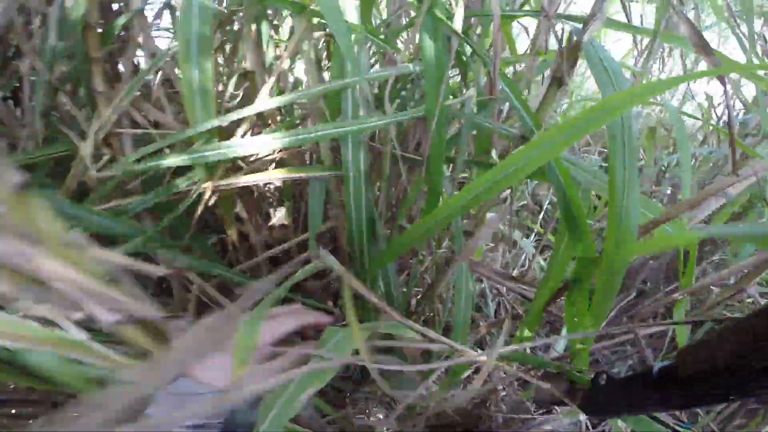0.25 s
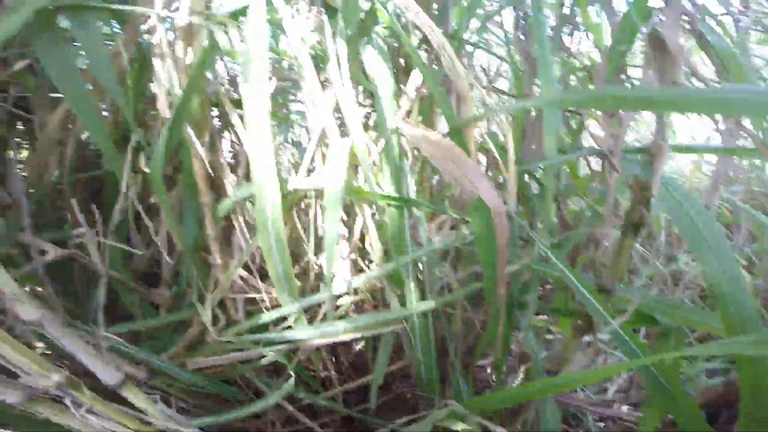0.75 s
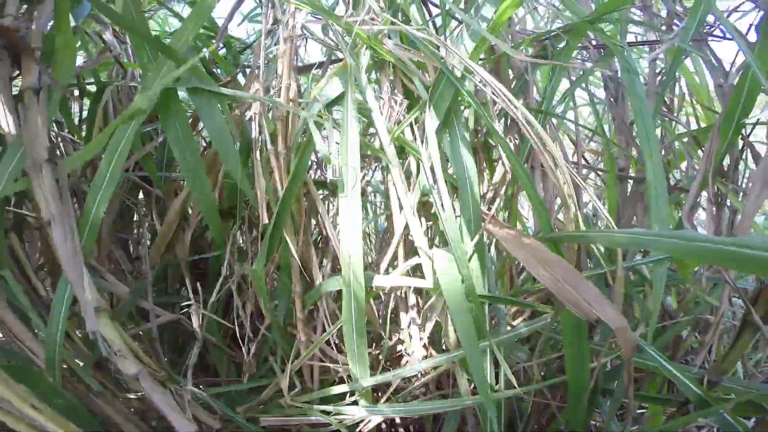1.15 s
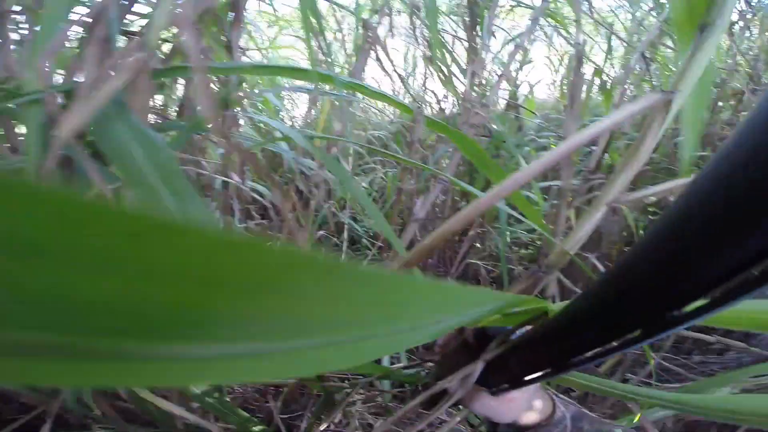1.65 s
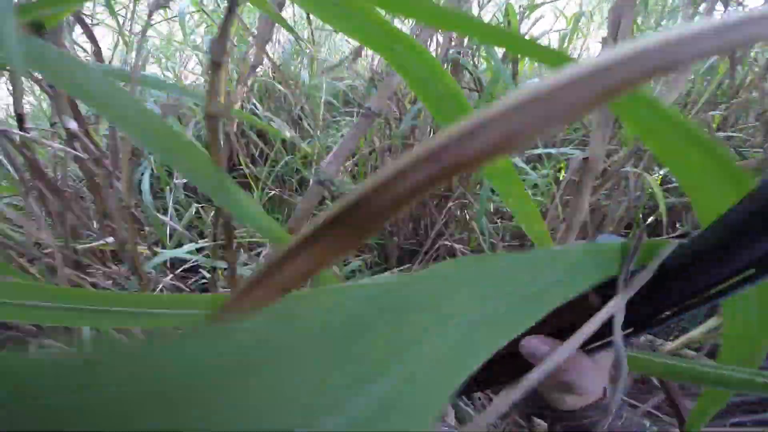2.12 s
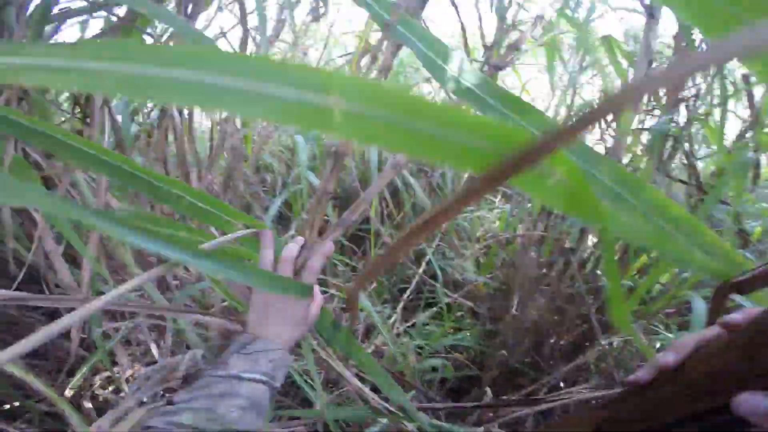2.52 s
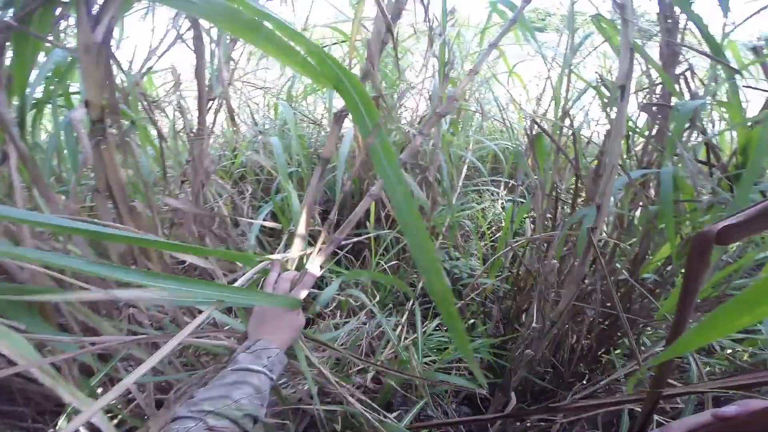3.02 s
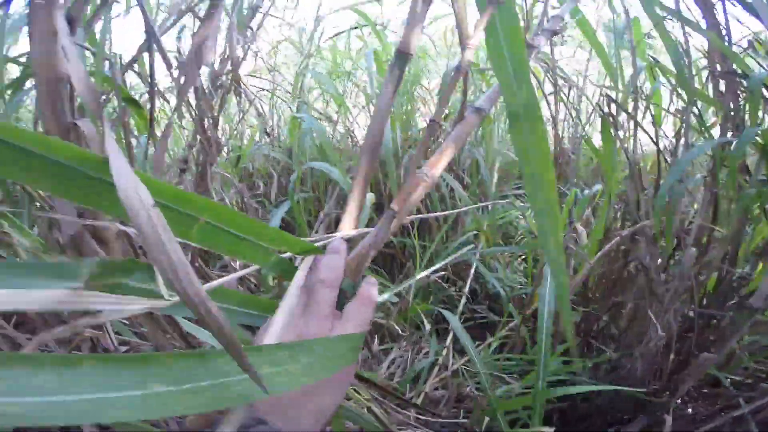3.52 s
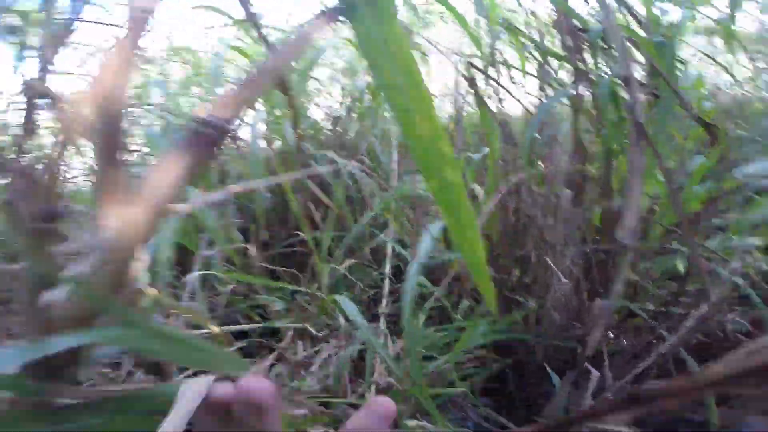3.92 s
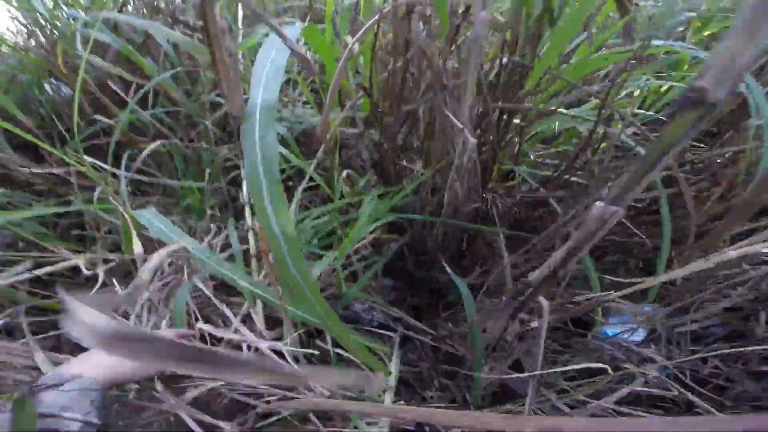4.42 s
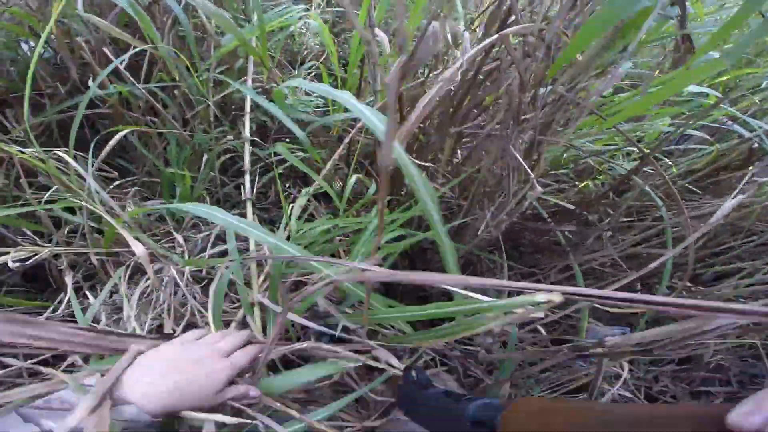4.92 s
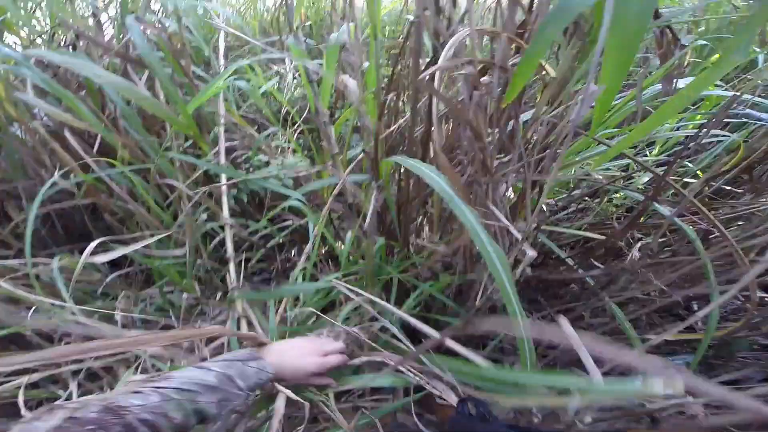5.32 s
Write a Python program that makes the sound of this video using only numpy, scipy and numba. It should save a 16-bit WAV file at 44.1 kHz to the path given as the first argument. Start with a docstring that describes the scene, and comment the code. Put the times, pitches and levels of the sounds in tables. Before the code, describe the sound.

Dense dry grass and reeds rustle and crackle right against a small body-worn camera outdoors. Sweeps of leaves swell over faint low rumble, strongest just after two seconds, with snapping stems, raspy blades and dull bumps. One very loud snap past four seconds drops into a quiet spell of tiny cracks, then sweeps, knocks and snaps crowd back in.

```python
"""Someone pushes through tall dry grass and reeds, a small camera on the chest; one port feeds both channels.
From 0 s short decaying sines merge into a rustle over band-noise rumble; sweeps swell it, fullest near 2.3 s.
Throughout, noise bursts make stems snap and stalks knock the housing, gritty narrow noise makes blades rasp,
and damped sines thump. The loudest snap, at 4.26 s, leads into a lull with small cracks; from about 4.9 s
the thumps, strong knocks and sweeps return, and snaps crowd the end."""
import sys
import numpy as np
from scipy import signal
from scipy.fft import rfft, irfft, next_fast_len
from scipy.io import wavfile
from scipy.ndimage import uniform_filter1d
from numba import njit

SR = 44100
rng = np.random.default_rng(int(sys.argv[2]) if len(sys.argv) > 2 else 0)


def persist_wave(psi):
    """Save psi, clipped to +-1, as 16-bit WAV."""
    counts = np.round(np.clip(psi, -1, 1) * 32767).astype(np.int16)
    wavfile.write(sys.argv[1], SR, np.atleast_2d(counts).T)


N = 245047

# Rumble level. Each row: time in seconds, deep band in dB, upper band in dB.
RUMBLE_LEVELS = [(0, -46, -50), (.6, -53, -43), (1.6, -46, -46.5), (1.9, -51.5, -51), (2.4, -46.5, -45),
                 (2.65, -55, -50), (2.85, -44.5, -44), (3.35, -47.5, -48.5), (4.22, -46, -42),
                 (4.29, -50, -53), (4.55, -55, -54), (4.86, -59, -51.5), (5.3, -50, -47), (5.556, -58, -49)]
# Dull thumps through the carrier's body. Each row: start in seconds, level before damping in dB, ring in Hz.
BODY_THUMPS = [(.124, -29.5, 204), (0.354, -36, 119), (.509, -31.5, 223), (.58, -26, 270), (.572, -32, 45),
               (.7, -25, 140), (.704, -36, 525), (2.38, -26, 517), (2.728, -31, 475), (2.775, -31, 35.2),
               (2.998, -37, 95), (3.34, -30, 50), (4.114, -25, 355), (4.315, -36, 200), (4.358, -41, 220),
               (4.408, -32, 133), (4.922, -32, 414), (5.228, -25, 353), (5.337, -23, 125),
               (5.478, -23, 420)]
# Stalks knocking the housing. Each row: top in seconds, level in dB, pitch in Hz, fall in ms.
HOUSING_KNOCKS = [(.1289, -31, 330, 4), (.3159, -37, 860, 10), (.5865, -32, 392, 11), (.707, -33, 754, 32),
                  (1.6235, -26.5, 1800, 1.5), (2.599, -28, 1000, 2.2), (3.0012, -28.5, 640, 11),
                  (3.0577, -33, 1280, 6), (3.097, -29, 550, 3), (3.221, -29.5, 700, 31),
                  (3.4045, -29.5, 550, 9.3), (4.2233, -32, 800, 7.7), (4.244, -30, 700, 6.6),
                  (4.9259, -35.5, 600, 21), (5.002, -37, 450, 7.4), (5.1824, -28.5, 990, 7),
                  (5.2351, -24.5, 670, 21), (5.3379, -23.5, 530, 71), (5.4817, -20.5, 680, 15)]
# Single blades dragged across each other. Each row: middle in seconds, level in dB, ring in Hz, length in ms.
BLADE_RASPS = [(.029, -27, 14000, 41), (.499, -32, 6600, 35), (0.576, -26, 8080, 55),
               (.721, -34, 2010, 120), (1.723, -27.5, 6500, 30), (2.326, -27.5, 5300, 54),
               (2.395, -21, 13700, 30), (2.696, -24, 5700, 26), (2.789, -31, 3260, 36),
               (3.223, -25, 2740, 23), (3.363, -24, 8650, 37), (3.419, -20, 8250, 55),
               (3.452, -34, 5700, 84), (3.513, -29, 5390, 110), (3.718, -26, 9400, 90),
               (3.753, -32, 5160, 88), (3.981, -26.5, 3900, 48), (4.207, -21, 8650, 26),
               (4.655, -29, 14100, 40), (5.272, -29, 3710, 39)]
# Dry leaves and stems breaking. Each row: top in seconds, leaf in dB, stem in dB, fall in ms.
STEM_SNAPS = [(0.1272, -13, -24, 3.5), (0.1395, -18, -36, 2), (0.5525, -32, -14.5, 1), (.5662, -13, -36, 1),
              (0.632, -20, -43, 13), (0.787, -25, -39, 1.7), (0.8358, -11, -43, 4.3), (1.1609, -30, -25, 2),
              (1.3113, -22, -40, 7), (1.6, -36, -24, 1), (1.6226, -11, -16, 1.2), (1.7497, -30, -26, 3),
              (1.8012, -10, -18, 5.4), (2.0692, -24, -22.5, 3), (2.1431, -24, -30, 5),
              (2.2251, -30, -22, 3), (2.2471, -30, -30, 1.5), (2.3223, -22, -24, 3), (2.4057, -11, -34, 1),
              (2.456, -19, -30, 1.5), (2.5956, -15, -23, 2.9), (2.6934, -26, -29, 6), (2.791, -26, -22, 5),
              (2.8289, -30, -18, 1.2), (3.032, -26, -18.5, 1), (3.0587, -28, -15.5, 4.7),
              (3.1487, -9.5, -32, .3), (3.2198, -17, -27, 2.2), (3.4134, -30, -21, 3),
              (3.4284, -15, -25, 4.6), (3.7246, -17, -28, 1), (3.7394, -28, -21, 2),
              (3.8901, -13, -32, 0.42), (3.8978, -21, -34, 1), (4.0425, -14, -34, 1),
              (4.053, -28, -21, 3.8), (4.138, -28, -18, 1.1), (4.205, -16, -37, 10),
              (4.2464, -14, -27, 2.7), (4.2587, -6, -8, 0.33), (4.3117, -21, -39, 1.2),
              (4.3178, -28, -42, 1), (4.339, -33, -48, 1), (4.3608, -27, -46, 3), (4.4608, -30, -48, 1.6),
              (4.596, -28, -46, 1), (4.6284, -40, -32.5, 4), (4.636, -21, -44, .5), (4.6692, -21, -42, .4),
              (4.6761, -17, -34, .4), (4.7042, -16, -38, 0.8), (4.724, -20.5, -40, 3),
              (4.7386, -34, -30, 3), (4.745, -25, -42, 2), (4.7657, -21, -40, 2.2), (4.833, -28, -38, 1.7),
              (4.9265, -32, -31, 2.6), (5.2409, -31, -24, 8), (5.2733, -20, -18, 1.8),
              (5.349, -26, -13.5, 1.5), (5.3592, -11, -30, 2.9), (5.384, -24, -13, 1.7),
              (5.41, -26, -31, 4.5), (5.4345, -16, -16, 1.1), (5.5233, -17, -30, 2), (5.5347, -7, -16, .5)]
# Pushing through. Each row: time in seconds, steady rustle in dB, extra rubbing on the housing in dB.
PUSH_LEVELS = [(0.0, -25, 1), (0.12, -26.5, -8), (0.2, -29, -2.5), (0.45, -28, 0.5), (0.65, -24.5, 1.5),
               (0.95, -27.5, 1.5), (1.1, -28.5, -1), (1.6, -29.5, 2.5), (1.8, -25.5, 2), (1.86, -32.5, 0),
               (1.98, -31, 2.5), (2.1, -24, 0), (2.5, -25.5, -1.5), (2.95, -25.5, -1.5), (3.3, -25, 2.5),
               (3.55, -24, 2), (3.64, -28.5, 5), (3.8, -24.5, 0.5), (4.25, -24.5, 5.5), (4.28, -42, 2.5),
               (4.5, -40.5, 4.5), (4.69, -36, 2.5), (4.74, -32, 1.5), (5.05, -28, 3.5), (5.22, -25, -6),
               (5.556, -25.5, -6)]
# Handfuls of grass swept aside. Each row: top in seconds, leaf in dB, stem in dB, housing in dB, rise in ms.
GRASS_SWEEPS = [(.055, -21.5, -38, -46, 66), (.135, -27, -34, -39, 14), (.335, -32, -38, -45, 24),
                (.58, -26.5, -33.5, -45, 74), (.72, -43, -32.5, -50, 60), (.93, -36, -34, -52, 75),
                (1.29, -32, -35, -57, 32), (1.72, -43, -33, -40, 35), (1.805, -27, -44, -50, 14),
                (2.245, -22.5, -41, -38, 36), (2.336, -16, -22.5, -32.5, 69), (2.375, -21, -23.5, -32, 35),
                (2.46, -21.5, -31, -42, 42), (2.555, -27, -37, -40, 28), (2.8, -25, -36, -46, 60),
                (2.86, -24, -31, -43, 17), (3.05, -21, -26.5, -43, 46), (3.095, -19, -27, -44, 30),
                (3.22, -21.5, -44, -43, 22), (3.43, -21, -46, -47, 86), (3.5, -21.5, -45, -51, 30),
                (3.72, -18.5, -35, -42, 34), (3.975, -21.5, -25, -47, 45), (4.081, -20.5, -28.5, -40, 60),
                (4.22, -22.5, -37, -30, 22), (4.32, -31, -45, -46, 11), (4.51, -36, -44.5, -49, 27),
                (4.655, -32.5, -43, -62, 27), (4.92, -28, -37, -49, 15), (4.98, -29, -34, -48, 13),
                (5.045, -31, -36, -48, 15), (5.13, -24, -33, -53, 55), (5.261, -22, -30, -29.5, 32),
                (5.37, -20.5, -25.5, -31, 96), (5.5, -25, -24, -25.5, 76)]
# Grain kinds. Each holds: grains per second, pitch spread in octaves (about the middle half),
# cycles to fall 20 dB, mean size scatter in dB, pitch drift in octaves per unit of walk().
LEAF_GRAINS = (12000, .4, 3.6, 1.05, 0.14)
STEM_GRAINS = (10000, 0.688, 5.6, 1.15, 0.11)
RUB_GRAINS = (5000, 0.893, 2.6, 2, 0.19)
# Microphone colour. Each row: frequency in Hz, gain in dB.
MIC_RESPONSE = [(20, 1.5), (150, -4), (500, -0.5), (2500, -4.5), (5000, 1.5), (7000, -1.76), (11000, 3),
                (13500, 3), (16000, -1.7)]

THUMP_FALL_MS, THUMP_FALL_CYCLES = 9.3, 0.43  # added together
KNOCK_RISE_MS = 4.9
RASP_WIDTH_SHARE = 0.22  # of the ring frequency
SNAP_RISE_MS, LEAF_SNAP_HZ, STEM_SNAP_HZ = 0.77, 10400, 3960
SWEEP_FALL_SHARE = 0.55  # of the rise time
LEAF_HZ, STEM_HZ, HOUSING_HZ = 11340, 4024, 854
STEM_DB, HOUSING_DB = -5.5, -15.5  # relative to the steady leaf level
STEM_RUB_SHARE = 0.28  # of the extra rubbing in dB
TOP_HZ = 15500


def undb(db):
    """Amplitude ratio from dB."""
    return 10 ** (np.asarray(db) / 20)


def unit(x):
    """Scales to an RMS of 1."""
    return x / np.sqrt(np.mean(x ** 2))


def band(x, lo_hz, hi_hz, order=2):
    """Butterworth band-pass."""
    sos = signal.butter(order, [lo_hz, min(hi_hz, .45 * SR)], "bandpass", fs=SR, output="sos")
    return signal.sosfilt(sos, x)


def walk(rate_hz):
    """Random levels held 1 / rate_hz s and slewed twice; spread about 0.27."""
    k = int(SR / rate_hz)
    steps = np.repeat(rng.standard_normal(N // k + 1), k)
    return 0.37 * uniform_filter1d(uniform_filter1d(steps, k), k)[:N]


def slips(rate_hz, fall_ms):
    """Sudden releases at random moments: level jumps up and sinks back; mean 0, spread 1."""
    kicks = (rng.random(N) < rate_hz / SR) * rng.exponential(size=N)
    x = signal.lfilter([1], [1, -np.exp(-1000 / (fall_ms * SR))], kicks)
    return unit(x - x.mean())


@njit
def ring(start, hz, t60_s, size, n):
    """Each grain is a sine that dies away from its start sample, by 60 dB in t60_s."""
    out = np.zeros(n)
    for k in range(len(start)):
        turn = np.exp(2j * np.pi * hz[k] / SR - np.log(1000) / (t60_s[k] * SR))
        z = size[k] + 0j
        for i in range(start[k], min(n, start[k] + int(t60_s[k] * SR))):
            out[i] += z.imag
            z *= turn
    return out


def fade(rise_ms, fall_ms):
    """Burst envelope, 40 ms before to 120 ms after its top: changes by e per rise or fall time."""
    ms = np.arange(-40, 120, 1000 / SR)
    return np.exp(np.where(ms < 0, ms / max(rise_ms, .1), -ms / max(fall_ms, .2)))


def add(out, x, top_s):
    """Mixes in a burst whose top lies 40 ms after its first sample."""
    i = int((top_s - .04) * SR)
    out[max(i, 0):i + len(x)] += x[max(-i, 0):N - i]


def snaps(table, lo_hz, hi_hz, width, broad, ragged_db):
    """Each crack is a burst of splinters: noise round its own pitch plus the broad band of its material."""
    out = np.zeros(N)
    for top_s, db, hz, rise_ms, fall_ms in table:
        shape = fade(rise_ms, fall_ms)
        splinters = rng.standard_normal((2, len(shape)))
        ragged = splinters[0] * undb(ragged_db * splinters[1])
        pitched = unit(band(ragged, hz / width, hz * width, order=1))
        material = unit(band(ragged, lo_hz, hi_hz))
        burst = (pitched + broad * material) * shape
        # the burst gets the energy of its envelope
        level = undb(db) * np.linalg.norm(shape) / np.linalg.norm(burst)
        add(out, burst * level, top_s)
    return out


def crackle(hz, rate_hz, octaves, cycles, scatter_db, wander):
    """Tiny cracks at random moments, each with its own pitch; a few are much larger than the rest."""
    when, pitch_draw, size_draw = rng.random((int(rate_hz * N / SR), 3)).T
    start = (when * N).astype(np.int64)
    # neighbours in time come from the same blade, so their pitches drift together
    centre_hz = (hz * 2 ** (wander * walk(35)))[start]
    spread = (pitch_draw / (1 - pitch_draw)) ** (0.4323 * octaves)
    pitch_hz = np.clip(centre_hz * spread, 40, .4 * SR)
    size = undb(np.minimum(-scatter_db * np.log(size_draw + 1e-9), 18))
    return unit(ring(start, pitch_hz, 3 * cycles / pitch_hz, size, N))


def rumble(deep_db, upper_db):
    """Low air and body movement at the port: two noise bands, wavering slowly."""
    deep = unit(band(rng.standard_normal(N), 24, 94)) * undb(deep_db + 1.0 * walk(12))
    upper = unit(band(rng.standard_normal(N), 77, 171)) * undb(upper_db + .9 * walk(6.8))
    return deep + upper


def thumps():
    """One damped swing of a body mode per thump, softened by the padding."""
    start_s, db, hz = np.transpose(BODY_THUMPS)
    fall_s = THUMP_FALL_MS / 1000 + THUMP_FALL_CYCLES / hz
    swing = ring((start_s * SR).astype(np.int64), hz, fall_s * np.log(1000), undb(db), N)
    return uniform_filter1d(swing, size=20)


def knocks():
    """The housing answers a knock with a short dull burst round its pitch."""
    table = [(top_s, db, hz, KNOCK_RISE_MS, fall_ms) for top_s, db, hz, fall_ms in HOUSING_KNOCKS]
    return snaps(table, 115, 1600, width=1.85, broad=1.0, ragged_db=3.5)


def rasps():
    """A dragged blade sticks and slips: gritty noise in one narrow band, swelling and sinking."""
    out = np.zeros(N)
    ms = np.arange(-80, 80, 1000 / SR)  # from the middle
    for middle_s, db, hz, length_ms in BLADE_RASPS:
        chance = rng.standard_normal((2, len(ms)))
        grit = chance[0] * undb(3.5 * unit(uniform_filter1d(chance[1], size=60)))
        swell = np.exp(-2 * (ms / max(length_ms / 2, 5)) ** 2)
        narrow = band(grit, hz * (1 - RASP_WIDTH_SHARE / 2), hz * (1 + RASP_WIDTH_SHARE / 2))
        add(out, undb(db) * unit(narrow) * swell, middle_s - .04)  # middle is 80 ms in
    return out


def breaks():
    """Each break has a bright part from the leaf and a lower part from the stem."""
    leaf = [(top_s, db, LEAF_SNAP_HZ, SNAP_RISE_MS, ms) for top_s, db, _, ms in STEM_SNAPS]
    stem = [(top_s, db, STEM_SNAP_HZ, SNAP_RISE_MS, ms) for top_s, _, db, ms in STEM_SNAPS]
    bright = snaps(leaf, 6000, 16000, width=1.25, broad=.8, ragged_db=2)
    low = snaps(stem, 1300, 6500, width=1.5, broad=2, ragged_db=2.5)
    return bright + low


def push(t):
    """Levels in dB of leaves, stems and housing: the steady rustle with each sweep's power added."""
    time_s, db, rub_db = np.transpose(PUSH_LEVELS)
    db, rub_db = np.interp(t, time_s, db), np.interp(t, time_s, rub_db)
    stem_db = db + STEM_DB + STEM_RUB_SHARE * rub_db
    power = undb([db, stem_db, db + HOUSING_DB + rub_db]) ** 2
    for top_s, *dbs, rise_ms in GRASS_SWEEPS:
        ms = 1000 * (t - top_s)
        span_ms = max(rise_ms, 5) * np.where(ms < 0, 1, SWEEP_FALL_SHARE)
        power += undb(dbs)[:, None] ** 2 * np.exp(-(ms / span_ms) ** 2)
    return 10 * np.log10(power)


def rustle(leaf_db, stem_db, rub_db):
    """Leaves, stems and housing crackle in shared bunches, as each handful of grass lets go."""
    bunch_db = 0.84 * slips(130, 23.0) + .5 * walk(30)
    leaf_db = leaf_db + bunch_db + .4 * slips(230, 2.4)
    stem_db = stem_db + 0.25 * bunch_db + 0.096 * slips(100, 9.3)
    rub_db = rub_db + 0.8 * bunch_db + 1.2 * walk(23.8)
    leaves = band(crackle(LEAF_HZ, *LEAF_GRAINS), 5170, 21200, order=4) * undb(leaf_db)
    stems = band(crackle(STEM_HZ, *STEM_GRAINS), 750, 7200) * undb(stem_db)
    housing = band(crackle(HOUSING_HZ, *RUB_GRAINS), 207, 1940) * undb(rub_db)
    return leaves + stems + housing


def scene():
    """Sums all sources to mono, then sets the channels slightly apart in the lows."""
    t = np.arange(N) / SR
    time_s, *dbs = np.transpose(RUMBLE_LEVELS)
    low_db = [np.interp(t, time_s, db) for db in dbs]
    mono = rumble(*low_db) + thumps() + knocks() + rasps() + breaks() + rustle(*push(t))
    side = undb(-22) * rumble(*low_db) + 0.055 * band(mono, 23, 180, order=1)
    apart = band(side, 15, 280, order=4)
    return np.array([mono + apart, mono - apart])


def record(dry):
    """Microphone colour, rounding of the loudest peaks, then the steep top cut."""
    hz, db = np.transpose(MIC_RESPONSE)
    size = next_fast_len(N)
    bin_hz = np.arange(1, size // 2 + 2) * SR / size
    gain = undb(np.interp(np.log(bin_hz), np.log(hz), db))
    coloured = irfft(rfft(dry, size) * gain, size)[:, :N]
    rounded = .85 * np.tanh(coloured / .85)
    return signal.sosfilt(signal.ellip(12, .2, 80, TOP_HZ, fs=SR, output="sos"), rounded)


dry = scene()
out = record(dry)
persist_wave(out)
```